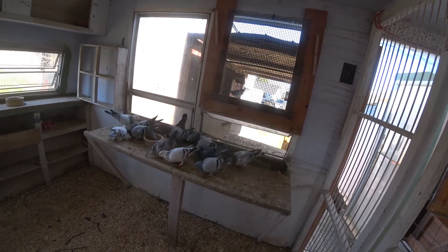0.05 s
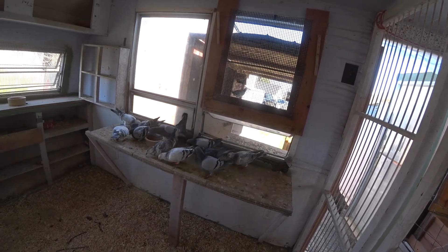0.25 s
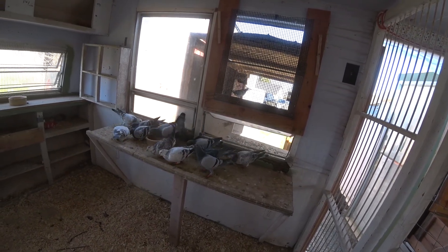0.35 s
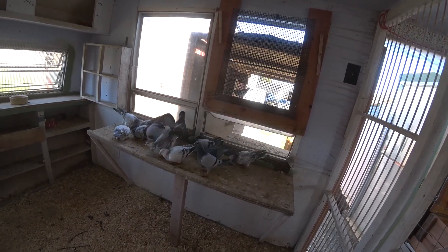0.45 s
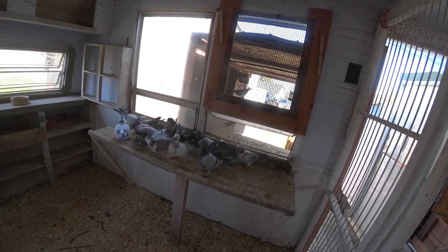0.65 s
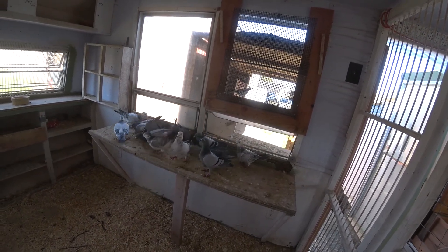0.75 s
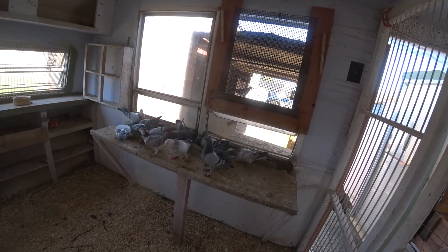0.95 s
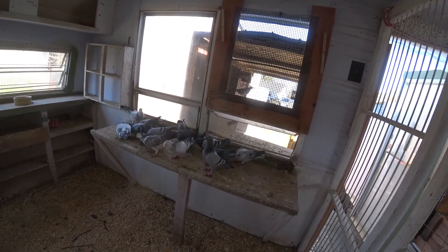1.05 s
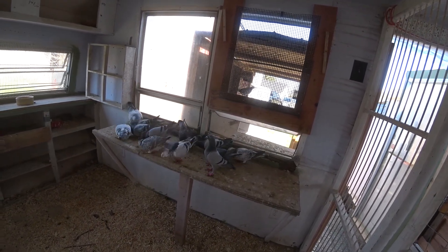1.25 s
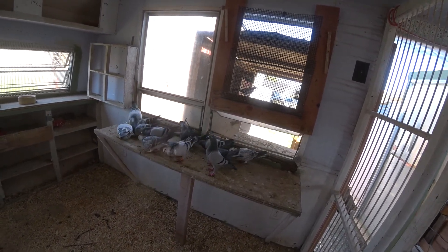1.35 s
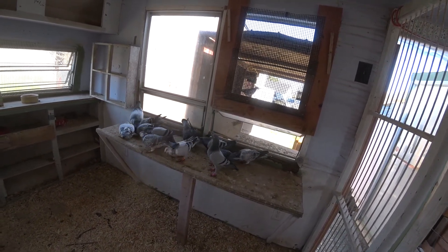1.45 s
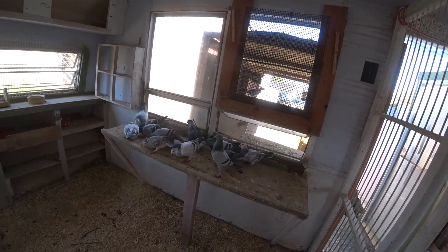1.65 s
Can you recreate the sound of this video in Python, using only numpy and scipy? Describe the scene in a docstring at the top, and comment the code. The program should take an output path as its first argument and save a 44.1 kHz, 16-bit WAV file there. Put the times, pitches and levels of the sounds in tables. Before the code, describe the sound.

Pigeons' claws scuff and tick on a gritty wooden shelf inside a small boarded loft

```python
"""Claws scuff, tick and rasp on a gritty wooden shelf where pigeons crowd in a small boarded loft.
Scuffs are random grit clicks, filtered into bands and dying away. Footfalls and hard knocks ring the
shelf at its own pitches, with soft noise thuds. One bird shakes out a wing, heard as a rustle of coloured
clicks, and lands hard. The flock shuffles underneath as dense coloured clicks that swell and sink, with a
faint rumble; a dying tail of noise gives the sound of the board walls."""
import sys
import numpy as np
from scipy import signal
from scipy.fft import rfft, irfft
from scipy.io import wavfile

SR = 44100
rng = np.random.default_rng(int(sys.argv[2]) if len(sys.argv) > 2 else 0)


def inscribe(sig):
    """Save sig as 16-bit PCM at rate SR to the path in sys.argv[1].

    A 1-D sig is mono; a 2-D sig holds one channel per row.
    Samples are clipped to [-1, 1] before scaling.
    """
    pcm = np.round(np.clip(np.atleast_2d(sig).T, -1, 1) * 32767)
    wavfile.write(sys.argv[1], SR, pcm.astype(np.int16))


N = 74970  # length in samples, 1.7 s

# Levels are relative: the sound functions below may add further gains.
# Claw scuffs: [t/s, treble peak level/dB, lower-band level/dB, time to fall 60 dB/s, build-up/s]
CLAW_SCUFFS = [(0.0024, -35, -41, 0.15, 0.003), (0.11, -28.5, -38.5, 0.17, 0.0057),
               (0.201, -31.5, -37.5, 0.13, 0.0058), (0.221, -32.5, -39, 0.15, 0.0034),
               (0.299, -27, -36.5, 0.17, 0.0038), (0.3431, -34, -60, 0.11, 0.0045),
               (0.376, -22.5, -33.5, 0.13, 0.0036), (0.535, -14, -27.5, 0.12, 0.0011),
               (0.559, -22.5, -39, 0.11, 0.0027), (0.583, -23, -32.5, 0.19, 0.0053),
               (0.6304, -34.5, -43, 0.87, 0.0057), (0.7155, -23.5, -33, 0.1, 0.0086),
               (0.731, -27, -34, 0.059, 0.0037), (0.768, -26, -35, 0.066, 0.0051),
               (0.8027, -28.5, -40.5, 0.12, 0.0052), (0.83, -20.5, -30, 0.18, 0.012),
               (0.866, -20, -30, 0.094, 0.0093), (0.9256, -21, -34, 0.19, 0.011),
               (0.9483, -27, -34, 0.074, 0.0033), (1.003, -28, -36, 0.12, 0.0034),
               (1.041, -28, -40, 0.084, 0.0026), (1.0907, -27, -41, 0.072, 0.0048),
               (1.1094, -28, -62, 0.094, 0.0046), (1.1265, -41, -32.5, 0.053, 0.003),
               (1.1454, -31, -36, 0.14, 0.0031), (1.163, -31, -43, 0.091, 0.0032),
               (1.2047, -25.5, -34.5, 0.073, 0.0038), (1.243, -21.5, -30.5, 0.16, 0.0032),
               (1.3484, -22.5, -34.5, 0.17, 0.0063), (1.4224, -38, -48.5, 0.14, 0.0041),
               (1.4742, -42, -54, 0.14, 0.0074), (1.509, -33, -37.5, 0.11, 0.0053),
               (1.5447, -34.5, -43.5, 0.19, 0.0049), (1.563, -34, -43.5, 0.16, 0.0035),
               (1.6691, -39.5, -50.5, 0.17, 0.004)]
# Sharp claw ticks among the scuffs and footfalls: [t/s, pulse level before filtering/dB]
CLAW_TICKS = [(0.5343, -4), (0.54, -6), (0.8342, -13), (0.8654, -13), (0.9298, -11), (1.2061, -14),
              (1.3517, -8.5)]
# Coarse rasps of a claw dragged slowly: [t/s, level/dB, time to fall 60 dB/s]
CLAW_RASPS = [(0.93, -40, 0.16), (1.146, -41, 0.21), (1.507, -42, 0.25)]
# Colour of the grit under a claw: [f/Hz, gain/dB]
GRIT_COLOUR = [(1060, -18), (1800, 2), (3000, -12.5), (4030, -5.5), (5850, -3.5), (9470, -12.5), (10600, 8),
               (11100, 11.5), (11500, -65)]
# Footfalls: [t/s, mid peak level/dB, low level/dB, settling time of the foot/s, favoured pitch f/Hz]
FOOTFALLS = [(0.002, -38, -71, 0.011, 910), (0.025, -32.5, -49, 0.023, 1490), (0.11, -34, -46, 0.0069, 850),
             (0.147, -39.5, -48, 0.048, 810), (0.183, -38.5, -50.5, 0.061, 880),
             (0.235, -35, -42.5, 0.02, 1020), (0.301, -40, -50.5, 0.025, 915),
             (0.383, -31, -42.5, 0.0079, 1640), (0.411, -33.5, -48, 0.018, 780),
             (0.439, -23.5, -41.5, 0.011, 1280), (0.54, -19.5, -30.5, 0.023, 790),
             (0.544, -41, -43, 0.011, 1310), (0.591, -22.5, -34.5, 0.014, 825),
             (0.631, -24, -35, 0.0091, 1280), (0.651, -25, -29.5, 0.011, 1240),
             (0.726, -27, -39.5, 0.031, 1180), (0.753, -26.5, -46, 0.021, 1080),
             (0.785, -29, -38.5, 0.0056, 795), (0.832, -33, -66, 0.027, 1590),
             (0.853, -35.5, -50, 0.015, 953), (0.904, -34, -45.5, 0.014, 1350),
             (0.926, -25, -39, 0.014, 950), (0.963, -34.5, -48, 0.046, 900), (1, -27.5, -43, 0.015, 1410),
             (1.084, -35, -51, 0.011, 1670), (1.203, -29.5, -41.5, 0.011, 805),
             (1.25, -27.5, -37.5, 0.0059, 1430), (1.281, -40, -49, 0.015, 842),
             (1.341, -32.5, -41, 0.011, 1460), (1.362, -38.5, -47.5, 0.024, 600),
             (1.494, -34.5, -50, 0.0089, 980), (1.508, -30, -55, 0.012, 970), (1.525, -37, -45, 0.03, 1060),
             (1.677, -37, -46.5, 0.015, 730)]
# Hard knocks of a foot: [t/s, peak level/dB, pitch favoured by the spot on the shelf f/Hz]
FOOT_KNOCKS = [(.236, -41.5, 1020), (.444, -31.5, 1280), (.539, -27.5, 780), (.546, -27.5, 1250),
               (0.548, -30.5, 300), (.566, -30.5, 293), (.633, -28.5, 1310), (1.509, -39, 1200),
               (1.51, -41, 3800), (1.519, -40, 1370), (1.52, -46, 3800), (1.679, -40.5, 607)]
# Ringing modes of the shelf: [f/Hz, level/dB, time to fall 60 dB/s]
SHELF_MODES = [(206.4, -7.5, 0.16), (269.5, 1, 0.16), (317.4, 1, 0.089), (442, -12, 0.12),
               (529, -4.5, 0.095), (644, -2, 0.058), (794, 0.5, 0.11), (848, -5, 0.22), (929, -4, 0.091),
               (1024, 0.0, 0.042), (1180, -3.5, 0.12), (1295.5, 3.5, 0.045), (1459, 4.5, 0.033),
               (1630, -1.5, 0.036), (3800, 2, 0.039)]
# Loudness of the wing shake: [t/s, level/dB]
WING_LEVEL = [(.395, -68), (.405, -34), (.436, -32.5), (.45, -30.5), (.464, -24.5), (.48, -33.5),
              (.508, -34.5), (.526, -40.5), (.535, -54)]
# Colour of rubbing feathers: [f/Hz, gain/dB]
FEATHER_COLOUR = [(880, -29), (1500, -7), (1840, -16), (2240, -5), (2460, -7), (4100, -2), (4650, 0),
                  (5300, -1.5), (6960, -1), (9700, -14.5), (10950, 0), (11600, -38)]
# Loudness of the shuffling flock: [t/s, low level/dB, treble level/dB]
SHUFFLE_LEVELS = [(0, -48, -50), (.09, -54, -53), (.28, -52.5, -52), (.36, -51.5, -51), (.6, -36, -46.5),
                  (.8, -49.5, -47), (1.0, -51.5, -52.5), (1.15, -50.5, -49.5), (1.32, -49.5, -55.5),
                  (1.48, -62.5, -60), (1.65, -62, -59), (1.7, -76, -56)]
# Colour of the shuffling: [f/Hz, gain/dB]
FLOCK_COLOUR = [(15, -67), (25, -71), (139, -50), (176, -3), (265, 0), (389, 1.5), (684, 4), (840, 5.5),
                (1480, 1.5), (1860, -3.5), (6210, 2.5), (10600, -7.5), (11500, 1), (15000, -62)]
# How alike the shuffling is at left and right: [f/Hz, likeness from 0 to 1]
LEFT_RIGHT_LIKENESS = [(60, 0.88), (170, 0.99), (490, 0.84), (1420, 0.43), (4070, 0.66), (11700, 0.53)]
# Stereo lean of the microphones: [f/Hz, left minus right level/dB]
STEREO_LEAN = [(60, -5.5), (220, -2.5), (840, -0.5), (3130, 1.5), (11700, 2)]

GRAINS_PER_S, GRAIN_SPREAD_DB = 9800, 4  # average click rate, unevenness of click size
CREST_DB = 9  # taken off a peak level to get an average level
SCUFF_DB, STEP_DB, THUD_DB, RUMBLE_DB = -1.5, -22, -5.5, -22
RASP_ATTACK_S, STEP_ATTACK_S = 0.0051, 0.0031
SPLIT_HZ = 560  # shelf modes below this follow the footfall's low level
STEP_DB_PER_OCTAVE, KNOCK_DB_PER_OCTAVE = 12.5, 23.5  # loss for modes away from the favoured pitch
BASS_CUT_HZ, TOP_CUT_HZ = 184, 11700
ROOM_T60_S, ROOM_DB, ROOM_DELAY_S, ROOM_LOW_HZ = 0.13, -8.5, 0.0032, 455
ROOM_WIDE_HZ, ROOM_WIDTH = 595, 0.91
ROOM_TREBLE_HZ, ROOM_TREBLE_WIDTH = 7240, 0.45  # the ears differ most in the treble
SHUFFLE_SPLIT_HZ = 2100


def amp(db):
    """Turn dB into a plain multiplier."""
    return 10 ** (np.asarray(db) / 20)


def rms_one(x):
    """Scale a sound to an average (rms) level of 1."""
    return x / np.sqrt(np.mean(x ** 2) + 1e-20)


def in_time(rows):
    """Draw straight lines between timed points, giving one value per sample for each column."""
    times, *columns = np.transpose(rows)
    return [np.interp(np.arange(N) / SR, times, column) for column in columns]


def at_hz(points, hz):
    """Read a frequency table, with straight lines along a log frequency scale."""
    table = np.array(points)
    return np.interp(np.log(np.maximum(hz, 1)), np.log(table[:, 0]), table[:, 1])


def band(x, low_hz, high_hz):
    """Keep the sound between two frequencies."""
    return signal.sosfilt(signal.butter(2, [low_hz, high_hz], "band", fs=SR, output="sos"), x)


def low_pass(x, hz, order):
    """Keep the sound below a frequency."""
    return signal.sosfilt(signal.butter(order, hz, fs=SR, output="sos"), x)


def high_pass(x, hz, order):
    """Keep the sound above a frequency."""
    return signal.sosfilt(signal.butter(order, hz, "high", fs=SR, output="sos"), x)


def colour(x, spectrum):
    """Shape a sound by a frequency table, then scale to rms 1."""
    gain = amp(at_hz(spectrum, np.fft.rfftfreq(N, 1 / SR)))
    return rms_one(irfft(rfft(x) * gain, N))


def grains():
    """Dense random clicks of uneven size and either sign, scaled to rms 1."""
    spread = np.minimum(rng.exponential(1, N), 3.0)
    sizes = amp(GRAIN_SPREAD_DB * spread) * rng.choice([-1, 1], N)
    happens = rng.random(N) < GRAINS_PER_S / SR
    return rms_one(sizes * happens)


def bursts(starts, levels_db, t60s, attacks):
    """Loudness of many bursts that build up and die away, added as power."""
    # each burst opens 2.2 ms ahead of its listed time
    t = np.maximum(np.arange(N) / SR - starts[:, None] + 0.0022, 0)
    rise = np.minimum(t / np.reshape(attacks, (-1, 1)), 1)
    fall = amp(levels_db[:, None] - 60 * t / t60s[:, None])
    return np.sqrt(((rise * fall) ** 2).sum(axis=0))


def scuffs():
    """Claws drag grit over the board in bursts whose treble dies fastest; some tick or rasp."""
    start, peak_db, low_db, t60, attack = np.transpose(CLAW_SCUFFS)
    high_db = peak_db - CREST_DB
    grit = colour(grains(), GRIT_COLOUR)
    low_grit = rms_one(band(band(grit, 2570, 5970), 2570, 5970))
    high_grit = rms_one(band(grit, 5480, 8530))
    top_grit = rms_one(band(grit, 10960, 11020))
    low = low_grit * bursts(start, low_db + SCUFF_DB, t60, attack)
    high = high_grit * bursts(start, high_db, t60 * 0.67, attack)
    top = top_grit * bursts(start, high_db, t60 * 0.5, attack)

    rasp_start, rasp_db, rasp_t60 = np.transpose(CLAW_RASPS)
    coarse = rms_one(band(grains(), 580, 2700))
    rasp = coarse * bursts(rasp_start, rasp_db, rasp_t60, RASP_ATTACK_S)

    ticks = np.zeros(N)
    for at, db in CLAW_TICKS:
        ticks[int(at * SR)] = amp(db)
    return low + high + top + rasp + band(ticks, 2300, 7700)


def steps():
    """Feet settle in soft contacts that ring the shelf and thud; hard knocks strike all its modes at once."""
    start, peak_db, low_db, settle, spot_hz = np.transpose(FOOTFALLS)
    mid_db = peak_db - CREST_DB
    t = np.maximum(np.arange(N) / SR - start[:, None], 0)
    # contact power: a quick rise, then 20 dB lost in each settling time
    contact = (np.minimum(t / STEP_ATTACK_S, 1) * amp(-20 * t / settle[:, None])) ** 2

    ringing = 0
    for hz, db, t60 in SHELF_MODES:
        if hz < SPLIT_HZ:
            strength_db = low_db
        else:
            strength_db = mid_db - STEP_DB_PER_OCTAVE * np.abs(np.log2(hz / spot_hz))
        drive = grains() * np.sqrt(amp(2 * strength_db) @ contact)
        for at, knock_db, knock_hz in FOOT_KNOCKS:
            loss_db = KNOCK_DB_PER_OCTAVE * abs(np.log2(hz / knock_hz))
            drive[int(at * SR)] += amp(knock_db - STEP_DB - loss_db)
        # a resonator: it turns by w and shrinks by r at every sample
        r, w = amp(-60 / (t60 * SR)), 2 * np.pi * hz / SR
        mode = signal.lfilter([0, np.sin(w)], [1, -2 * r * np.cos(w), r * r], drive + 1e-18)
        ringing = ringing + amp(db + STEP_DB) * mode

    noise = rng.standard_normal((2, N))
    low_thud = rms_one(band(noise[0], 290, 560)) * bursts(start, low_db, 9 * settle, STEP_ATTACK_S)
    mid_thud = rms_one(band(noise[1], 750, 2010)) * bursts(start, mid_db, 7 * settle, STEP_ATTACK_S)
    return high_pass(ringing + amp(THUD_DB) * (low_thud + mid_thud), BASS_CUT_HZ, 4)


def wing():
    """Feathers rub in a swelling rustle: coloured clicks that follow a loudness curve."""
    before = (WING_LEVEL[0][0] - .01, -90)
    after = (WING_LEVEL[-1][0] + .01, -90)
    level_db, = in_time([before] + list(WING_LEVEL) + [after])
    return amp(level_db) * colour(grains(), FEATHER_COLOUR)


def loft(x):
    """Board walls answer with a dense dying tail, partly different at each ear."""
    t = np.arange(SR // 2) / SR
    decay = amp(-60 * t / ROOM_T60_S) * (t > ROOM_DELAY_S)
    mid, side = rng.standard_normal((2, len(t))) * decay
    side = high_pass(side, ROOM_WIDE_HZ, 1)
    side = side + ROOM_TREBLE_WIDTH * high_pass(side, ROOM_TREBLE_HZ, 2)
    mid = high_pass(mid, ROOM_LOW_HZ, 2)
    tails = mid + ROOM_WIDTH * side * [[1], [-1]]
    tails = tails / np.sqrt((mid ** 2).sum())
    return amp(ROOM_DB) * signal.fftconvolve(x[None], tails, axes=1)[:, :N]


def shuffle():
    """Many small movements of the flock blur into wide coloured clicks, with a faint rumble."""
    low_db, high_db = in_time(SHUFFLE_LEVELS)
    alike = np.clip(at_hz(LEFT_RIGHT_LIKENESS, np.fft.rfftfreq(N, 1 / SR)), 0, 1)
    # the shared part is the same in both ears, the side part is flipped in the right one
    shared = np.sqrt(1 + alike) * rfft(colour(grains(), FLOCK_COLOUR))
    side = np.sqrt(1 - alike) * rfft(colour(grains(), FLOCK_COLOUR))
    pair = irfft(shared + side * [[1], [-1]], N)
    low = rms_one(low_pass(pair, SHUFFLE_SPLIT_HZ, 2))
    high = rms_one(high_pass(pair, SHUFFLE_SPLIT_HZ, 2))

    rumble_mid, rumble_side = band(rng.standard_normal((2, N)), 82, 193)
    rumble = amp(RUMBLE_DB) * rms_one(rumble_mid + 0.23 * rumble_side * [[1], [-1]])
    # the minus sign keeps the two halves from cancelling where they overlap
    return amp(low_db) * (low + rumble) - amp(high_db) * high


def scene():
    """Add the near birds, their sound off the walls and the flock underneath."""
    near = scuffs() + steps() + wing()
    return near + loft(near) + shuffle()


def record(dry):
    """The microphones lean left in the treble and right in the bass; the top is cut."""
    half_lean_db = at_hz(STEREO_LEAN, np.fft.rfftfreq(N, 1 / SR)) * [[.5], [-.5]]
    leaned = irfft(rfft(dry) * amp(half_lean_db), N)
    return signal.sosfilt(signal.cheby2(12, 60, TOP_CUT_HZ, fs=SR, output="sos"), leaned)


dry = scene()
out = record(dry)
inscribe(out)
```